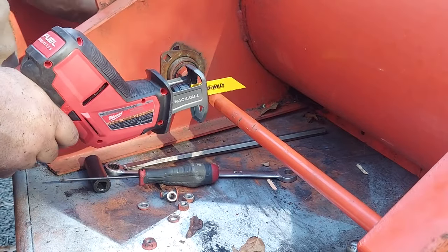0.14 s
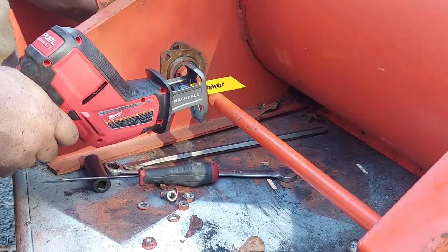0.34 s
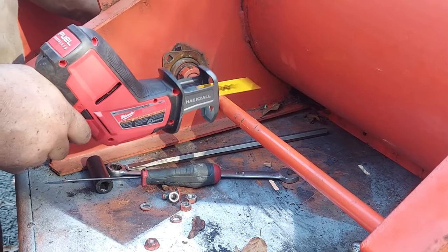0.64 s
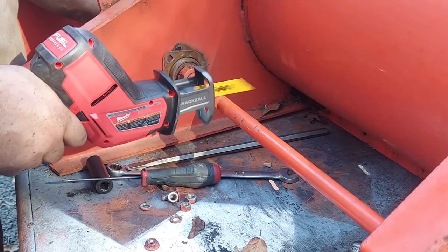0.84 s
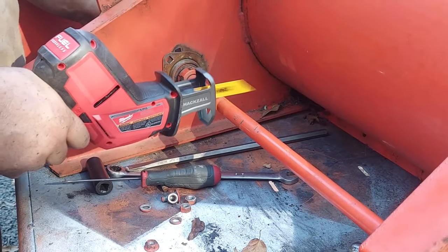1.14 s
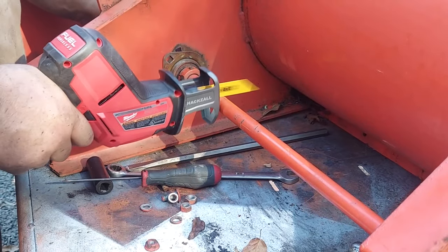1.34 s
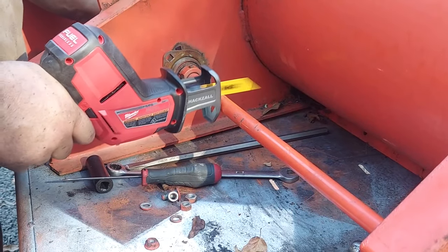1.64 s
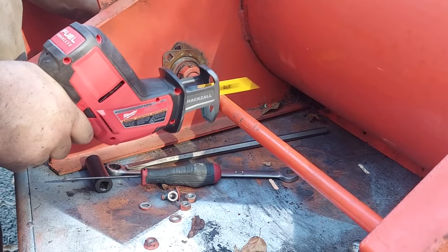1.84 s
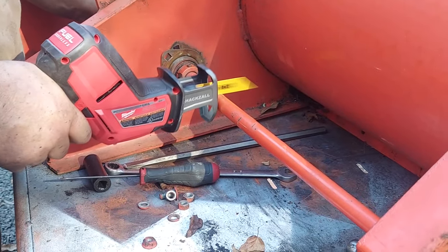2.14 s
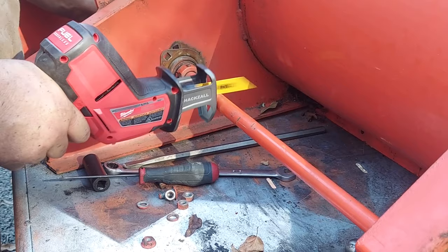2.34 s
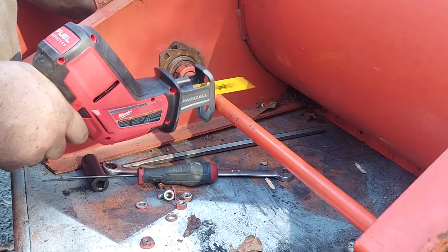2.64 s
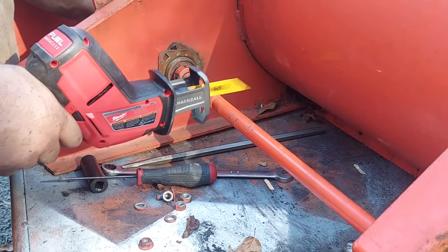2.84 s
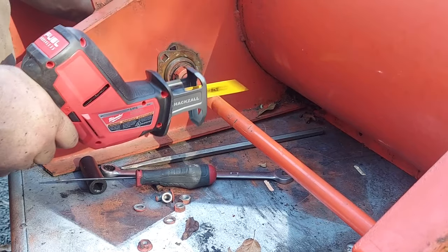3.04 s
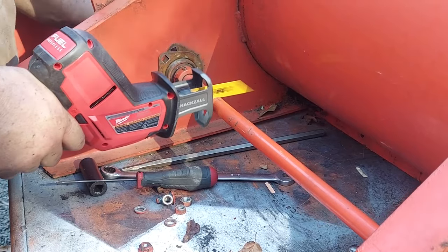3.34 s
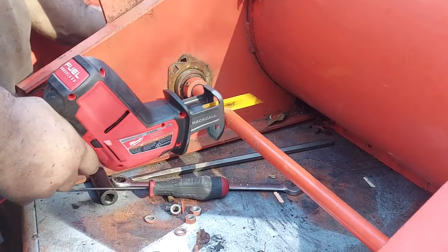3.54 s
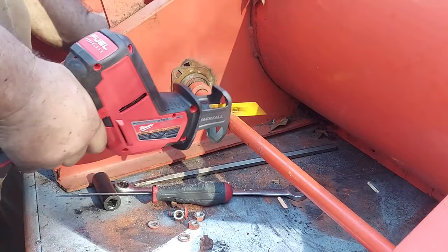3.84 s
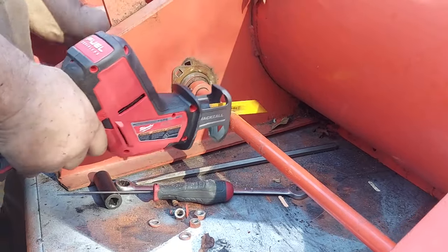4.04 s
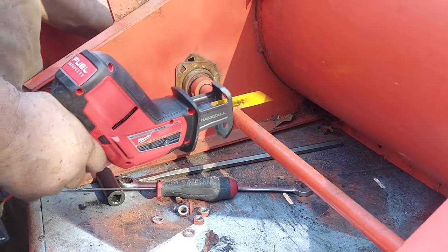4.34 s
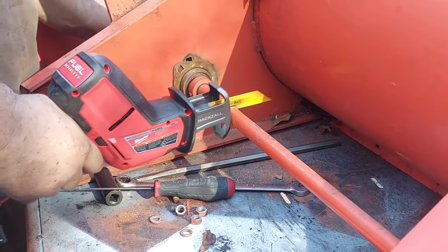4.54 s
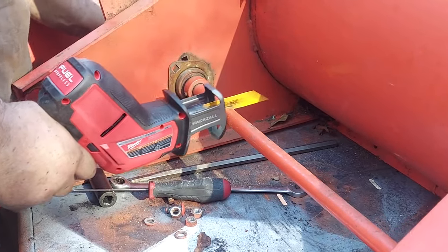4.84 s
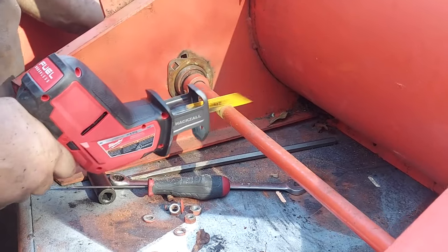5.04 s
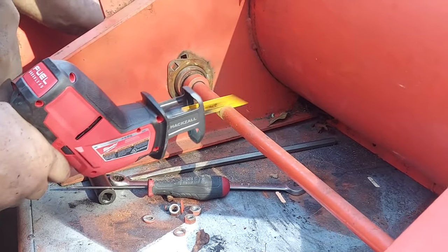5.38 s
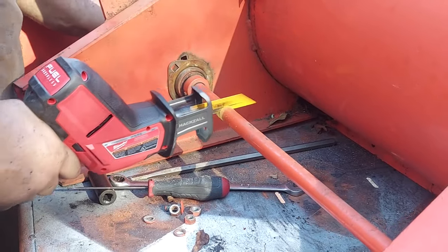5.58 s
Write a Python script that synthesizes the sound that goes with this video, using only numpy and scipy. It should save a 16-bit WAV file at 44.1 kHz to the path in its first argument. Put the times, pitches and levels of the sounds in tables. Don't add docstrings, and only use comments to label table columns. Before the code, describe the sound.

After a quiet moment, trigger clicks and chirps lead into harsh metal sawing, which jumps at three seconds to a frantic sped-up whine.

```python
import sys
import numpy as np
from scipy import signal
from scipy.fft import rfft, irfft, next_fast_len
from scipy.io import wavfile
from scipy.ndimage import uniform_filter1d, map_coordinates

SR = 44100
rng = np.random.default_rng(int(sys.argv[2]) if len(sys.argv) > 2 else 0)


def elevation(decibels):
    levels = np.asarray(decibels, float)
    return 10 ** (levels / 20)


def digitize_waveform(pressure):
    field = np.atleast_2d(pressure).T
    bounded = np.clip(field, -1, 1)
    quanta = np.round(bounded * 32767).astype(np.int16)
    wavfile.write(sys.argv[1], SR, quanta)


N = 251811


def rms_one(x):
    return x / np.sqrt(np.mean(x ** 2) + 1e-20)


def at_hz(points, hz):
    table_hz, value = np.transpose(points)
    return np.interp(np.log(hz), np.log(table_hz), value)


def at_time(points, t):
    return np.interp(t, *np.transpose(points))


def in_time(rows):
    s, *columns = np.transpose(rows)
    at = np.arange(round(s[0] * SR), min(round(s[-1] * SR), N))
    return at[0], [np.interp(at / SR, s, c) for c in columns]


def add(mix, start, x):
    mix[:, start:start + x.shape[-1]] += x[..., :N - start]


def drift(size, rate_hz):
    knots = rng.standard_normal(int(size / SR * 200) + 400)
    r = np.exp(-2 * np.pi * min(rate_hz, 60) / 200)
    slow = rms_one(signal.lfilter([1], [1, -2 * r, r * r], knots)[398:])
    return np.interp(np.arange(size) / SR * 200, np.arange(len(slow)), slow)


def swells(events, t, rise_db_per_s, fall_db_per_s):
    s, db, held = np.transpose(events)[:, :, None]
    rising = rise_db_per_s * np.maximum(s - t, 0)
    falling = fall_db_per_s * np.maximum(t - s - held, 0)
    return np.max(db - rising - falling, axis=0)


def resonate(x, hz, width_hz):
    r = np.exp(-np.pi * width_hz / SR)
    poles = [1, -2 * r * np.cos(2 * np.pi * hz / SR), r * r]
    return signal.lfilter([(1 - r * r) / 2, 0, (r * r - 1) / 2], poles, x)


def high_passed(x, hz):
    return signal.sosfilt(signal.butter(3, hz, "high", fs=SR, output="sos"), x)


def coloured(x, spectrum):
    size = next_fast_len(x.shape[-1])
    hz = np.maximum(np.fft.rfftfreq(size, 1 / SR), 1)
    shaped = irfft(rfft(x, size) * elevation(at_hz(spectrum, hz)), size)
    return rms_one(shaped[..., :x.shape[-1]])


def grit(shape, spread_db):
    sizes = elevation(spread_db * rng.standard_normal(shape))
    return rms_one(rng.standard_normal(shape) * sizes)


def spliced(x):
    at = np.arange(x.shape[-1])
    return x * np.minimum(np.minimum(at, at[::-1]) / (.002 * SR), 1)


# (frequency [Hz], density [dB per Hz])
YARD = [(15, -40), (25, -35), (43, -28), (102, -1), (236, -9), (591, -9), (1160, -24), (1560, -16),
        (2280, -32), (4370, -41), (6380, -18), (9320, -48), (16000, -57)]


def yard(size):
    mid, side = coloured(rng.standard_normal((2, size)), YARD)
    return elevation(-61.5) * (mid + 0.7 * side * [[1], [-1]])


# (time [s], level [dB], time to fall 25 dB [s])
CHIRPS = [
    (0.238, -32.5, 0.015),
    (0.407, -36, 0.013),
    (0.443, -30, 0.012),
]
CHIRP_OVERTONES = [12, -12, -36, -26]


def chirps():
    out, t = np.zeros((2, N)), np.arange(int(.08 * SR)) / SR
    for s, db, t60 in CHIRPS:
        tone = sum(elevation(overtone_db) * np.sin(2 * np.pi * k * 3870 * t)
                   for k, overtone_db in enumerate(CHIRP_OVERTONES, 1))
        flutter = 1 + 0.35 * drift(len(t), 60.0)
        attack = 1 - np.exp(-t / 0.00054)
        decay = elevation(db - 25 * t / t60) + elevation(db - 28 - 80 * t)
        add(out, round(s * SR), decay * attack * tone * flutter)
    return out


# (time [s], peak level [dB])
TICKS = [
    (0.248, -26),
    (0.28, -29),
    (0.289, -27),
    (0.304, -43),
    (.3625, -39),
    (.4025, -34),
    (0.408, -20),
]


def ticks():
    out, t = np.zeros((2, N)), np.arange(int(.08 * SR)) / SR
    for s, db in TICKS:
        snap = rng.standard_normal((2, len(t))) + 0.46 * rng.standard_normal(len(t))
        body = resonate(resonate(snap, 2400, 5200), 3400, 7900)
        add(out, round(s * SR), elevation(db - 3.5 - 60 * t / 0.024) * body)
    return out


BITE_S = .4295
# (time [s], level [dB], held [s])
SHUFFLES = [
    (.242, -41, 0.022),
    (.28, -33, 0.006),
    (.295, -36.5, 0.0038),
    (.32, -47, 0.03),
    (.405, -40, .02),
]
# (frequency [Hz], density [dB per Hz])
SHUFFLE_COLOUR = [(35, -39.5), (60, -22), (258, -20), (364, -21), (587, -12), (658, -20), (1250, -18.5),
                  (1600, -22.5), (2200, -27.5), (14000, -60)]


def shuffle():
    out, start = np.zeros((2, N)), round(CHIRPS[0][0] * SR)
    t = np.arange(start, BITE_S * SR) / SR
    db = swells(SHUFFLES, t, rise_db_per_s=4000, fall_db_per_s=400)
    mid, side = coloured(grit((2, len(db)), spread_db=5.0), SHUFFLE_COLOUR)
    add(out, start, elevation(db) * (mid + 0.47 * side * [[1], [-1]]))
    return out


# (time [s], level over a light touch [dB], held [s])
LEANS = [(3.4, 8.5, .09), (3.57, 7, 0.04), (3.66, 14, .14), (3.86, 12.5, 0.029), (4.09, 9, 0.028),
         (4.24, 13.5, .05), (4.44, 15.5, 0.072), (4.56, 10, 0.042), (4.65, 16, 0.21), (4.93, 6.5, 0.0386),
         (5.3, 10, 0.081), (5.43, 14, 0.0413), (5.54, 15.5, 0.061), (5.66, 10, 0.042)]


def shoe_lean(t):
    return swells(LEANS, t, rise_db_per_s=220.5, fall_db_per_s=190)


LASTING = [0.39, .25, .25]
# (order [per stroke], level [dB])
FAVOURED = [
    [(4, -7.5), (5, 3), (7, -4), (8, -4), (9, 1), (13, 3), (14, -1), (15, 1), (16, 2.5), (17, -1),
     (18, -1.5), (20, 5), (23, -2.5), (24, 2), (25, -3), (30, 2)],
    [(3, -6), (10, 1), (12, 1.5), (14, -5), (16, -5), (17, -5), (23, -3), (24, 0), (25, 2), (27, -1),
     (28, -4)],
    [(5, -5), (7, -4), (8, -4), (9, -6), (10, 1.5), (12, 1.5), (16, -4), (18, -10), (19, -5), (20, -2),
     (21, -1), (22, -5), (23, -7), (24, -1), (25, 1), (27, 1)],
]


def teeth(strokes, memory, speed):
    slots = int(len(strokes) / strokes[-1])
    fresh = grit((2, int(len(strokes) / slots * 1.2) + 40, slots), spread_db=3.0)
    wearing = rms_one(signal.lfilter([1], [1, -memory], fresh, axis=1)[:, 30:])
    lasting = np.exp(1j * np.angle(rfft(fresh[:, :1])))
    share = LASTING[speed]
    orders = np.sqrt(1 - share) * rfft(wearing) + np.sqrt(share * slots) * lasting
    for k, db in FAVOURED[speed]:
        orders[..., k] *= elevation(db)
    worn = irfft(orders, slots).reshape(2, -1)
    return rms_one(np.array([map_coordinates(w, [strokes * slots], order=3) for w in worn]))


# (frequency at true speed [Hz], share [0-1])
SAMENESS = [(40, .6), (100, .72), (180, .84), (300, .86), (420, .8), (700, .78), (1100, .66), (1500, .6),
            (3000, .4), (8000, .1)]
# (frequency at true speed [Hz], depth [dB])
THROB = [(100, 4.5), (600, 2), (1500, 1.5), (2600, 2.5), (5000, 1.13), (9000, 3.5), (15000, 3.5)]
# (frequency at true speed [Hz], likeness [0-1])
LIKENESS = [(30, .9), (60, .95), (125, .985), (250, .975), (500, .95), (700, .82), (1000, .66), (1400, .5),
            (1900, .25), (3000, .1), (15000, .05)]
# (frequency at true speed [Hz], level [dB])
LEFT = [(60, 2.5), (250, 0.5), (500, -0.5), (1000, -2), (2000, 1), (4000, 0.3), (12000, -1.2)]
# (time [s], steadiness [0-1])
STEADY = [(.4, .72), (1.3, .65), (2.2, .92), (2.96, .9), (3.0, 1), (3.07, .97), (3.1, .8), (3.18, .85),
          (3.22, .98), (3.62, .95), (3.72, .7), (4.25, .68), (4.33, .97), (5.71, 1)]


def tooth_drive(strokes, now, lean_db, haste, speed, memory, flicker_db):
    size = len(strokes)
    steady = at_time(STEADY, now)
    again, loose = teeth(strokes, memory, speed), grit((2, size), spread_db=5.0)
    turn = 2 * np.pi * strokes
    beat = np.cos(turn) * 0.74 + np.cos(2 * turn - .8)
    together = drift(size, 31.0 * haste)
    low_lean_db = 0.19 * (np.maximum(lean_db, -3) - 8 * (speed == 2))

    def drive(hz, phased, delayed=True):
        true_hz = hz / haste
        same, alike = at_hz(SAMENESS, true_hz) * steady, at_hz(LIKENESS, true_hz)
        path = rng.integers(1000)
        returning = np.roll(again, delayed * path // haste, axis=1)
        chance = np.roll(loose, int(hz) + path, axis=1)
        mid, side = np.sqrt(same) * returning + np.sqrt(1 - same) * chance
        quarter_later = (-1) ** path * np.roll(mid, round(SR / hz / 4))
        side = np.sqrt(1 - phased) * side + np.sqrt(phased) * quarter_later
        swell_db = at_hz(THROB, true_hz) * beat
        swell_db = swell_db + flicker_db * (0.81 * together + drift(size, 7.1 * haste))
        if hz < 450 * haste:
            swell_db = swell_db + 7.5 * (1 - steady)
        if hz < 360 * haste:
            swell_db = swell_db + low_lean_db
        balance = elevation(at_hz(LEFT, true_hz) * np.array([[.5], [-.5]]))
        image = np.sqrt(1 + alike) * mid + np.sqrt(1 - alike) * side * [[1], [-1]]
        return elevation(swell_db) * balance * image

    return drive


def evened(x, haste):
    power = np.mean(x ** 2, axis=0)
    local = uniform_filter1d(power, size=int(.12 * SR / haste)) + 1e-20
    return x * (power.mean() / local) ** (.7 / 2)


PHASED_BANDS, PHASED_MODES = 0.26, 0.55


def add_rasp_bands(parts, drive, colour, haste, edges_hz):
    edges = np.geomspace(38 * haste, 17500, 19)
    for k, (low, high) in enumerate(zip(edges, edges[1:])):
        hz = np.sqrt(low * high)
        band_pass = signal.butter(2, [low, high], "band", fs=SR, output="sos")
        band = signal.sosfilt(band_pass, drive(hz, PHASED_BANDS, delayed=False))
        gain = (-1) ** k * elevation(at_hz(colour, hz))
        parts[np.searchsorted(edges_hz, hz)] += gain * band


# (frequency at true speed [Hz], width [Hz],
# level over the colour at normal [dB], fivefold [dB], sixfold speed [dB])
BODY = [(380.2, 15.4, 10.5, 3, 6.5), (543.6, 41.4, 11.5, -6, -3.5), (623.3, 18, 4, 2, -11),
        (661, 9.6, 8, 5, -2), (1000, 70, 1, 3, 5), (1241, 12.5, 8.5, 12.5, 6.5), (1517, 65, 0.5, -4, 9.5),
        (1675, 30, 3.5, 4, -16), (1930, 37, 3, 5, 5), (2455, 70, 2.5, -9, 8), (2528, 61, 5, 0, 6),
        (2626, 75, 6, 6, 8), (1820, 280, 4.5, -4, 3), (3050, 200, 7, 10, 0), (4615, 147, 1, 0, 0)]
# (time [s], level [dB])
PANEL = [(.4, -10), (1.05, -5), (1.35, 2.5), (2.25, 3), (2.5, 0.5), (2.961, -8.5), (3.0, 2.5)]
# (time [s], level [dB])
SHALLOW = [(.4, -11), (.46, 0.5), (1.0, -0.5), (1.3, -7), (5.71, -13)]


def add_body_rings(parts, drive, now, colour, haste, speed, edges_hz):
    for true_hz, true_width_hz, *levels_db in BODY:
        hz, width_hz = true_hz * haste, true_width_hz * haste
        if hz >= 16500:
            continue
        db = at_hz(colour, hz) + levels_db[speed] + 1.95 * drift(len(now), 1.4 * haste)
        if abs(true_hz / 545 - 1) < .16:
            db = db + at_time(PANEL, now)
        if abs(true_hz / 1820 - 1) < .05:
            db = db + at_time(SHALLOW, now)
        ring = resonate(resonate(drive(hz, PHASED_MODES), hz, width_hz), hz, 4 * width_hz)
        parts[np.searchsorted(edges_hz, hz)] += elevation(db) * evened(ring, haste)


def shaft_ring(drive, haste):
    hz = 1520 * haste
    ring = evened(resonate(drive(hz, PHASED_MODES), hz, 16.3 * haste), haste)
    return rms_one(resonate(ring, hz, hz))


# (housing [dB], rasp [dB], hiss [dB], shaft ring [dB])
LAYERS = [
    (-20, -17.5, -28, -21),
    (-30, -21, -23.5, -19.5),
    (-26.5, -23.5, -24, -23),
]
# (housing, rasp, hiss, shaft ring [dB per s])
DEEPENING = [(-2.5, -0.29, 0.5, -0.81), (3, 1, 3.5, -0.7), (-0.2, -0.78, -3, -1.55)]
# (housing, rasp, hiss, shaft ring [dB per dB])
FEED_SHARES = [(0.29, 1.1, 0.62, 0.32), (0.5, 0.9, 1, 0.32), (0.38, 0.24, 0.77, 3.4)]
# (housing, rasp, hiss [dB per dB])
BIND_SHARES = [(.01, 0.086, 0.15), (.01, .1, 0.18), (.01, .2, .45)]
# (time [s], level over the usual ring [dB], held [s])
BINDS = [(.51, 9.5, 0.0076), (.66, 9, 0.0092), (.82, -2, .01), (1.15, 8, 0.018), (1.42, 6.5, 0.078),
         (1.84, 10, 0.016), (1.98, 3, 0.028), (2.07, -5, .01), (2.24, 9, 0.15), (2.39, 11, 0.039),
         (2.53, 8.5, .2), (2.75, 10, 0.028), (2.86, -2, 0.074), (3.03, 4.5, 0.0076), (3.2, 1.5, 0.026),
         (3.43, 4.5, 0.0072), (3.6, 11, 0.032), (3.82, 6, 0.0063), (3.88, 2, .2), (4.2, 7, 0.007),
         (4.29, 7, 0.038), (4.39, 7, 0.019), (4.52, 11, 0.035), (4.6, 7, 0.045), (4.87, 9, 0.0034),
         (5.0, 8, 0.013), (5.1, 14, 0.026), (5.37, 9, 0.18), (5.705, 8.5, 0.011)]


def cut(rows, colour, haste, speed, edges_hz, memory, flicker_db):
    start, (per_s, feed_db) = in_time(rows)
    size = len(per_s)
    t = np.arange(size) / SR
    now = t + start / SR
    lean_db = shoe_lean(now) * (speed == 2)
    sag = .5 * uniform_filter1d(np.maximum(lean_db, 0), size=int(.05 * SR))
    strokes = np.cumsum(per_s - sag) / SR
    bind_db = np.maximum(swells(BINDS, now, rise_db_per_s=233, fall_db_per_s=250), 0)
    settings = zip(LAYERS[speed], DEEPENING[speed], FEED_SHARES[speed], (*BIND_SHARES[speed], 1))
    housing_db, rasp_db, hiss_db, ring_db = (
        db + slope * t + fed * feed_db + bound * bind_db for db, slope, fed, bound in settings)

    drive = tooth_drive(strokes, now, lean_db, haste, speed, memory, flicker_db)
    parts = np.zeros((3, 2, size))
    add_rasp_bands(parts, drive, colour, haste, edges_hz)
    add_body_rings(parts, drive, now, colour, haste, speed, edges_hz)
    for k, edge in enumerate(edges_hz):
        parts[k + 1] = high_passed(parts[k + 1], .5 * edge)
    sound = elevation(ring_db - 3.0) * shaft_ring(drive, haste)
    for part, db in zip(parts, (housing_db, rasp_db - 0.48, hiss_db)):
        sound += elevation(db + 3.0) * rms_one(part)
    late_left = np.pad(sound[0], (2 // haste, 0))[:size]
    return start, np.array([late_left, sound[1]]), 2 * np.pi * strokes


# (time [s], unloaded strokes [per s], feed pressure [dB])
NORMAL = [(.403, 29.3, -15), (.43, 32, -5), (.465, 35, -1), (.55, 42.2, -3), (1.12, 41.4, 2),
          (1.27, 40.7, 1), (1.44, 41.3, 0), (2.2, 41.4, -1.5), (2.66, 40.6, -0.5), (2.9, 41.4, 0),
          (2.97, 41.0, -4)]
# (frequency [Hz], density [dB per Hz])
NORMAL_COLOUR = [(18, -72), (30, -43.5), (332, -13.5), (369, -13.5), (455, -8), (546, -4), (709, -5.5),
                 (1360, -1), (1510, 0.5), (2070, -7.5), (2550, -5), (3490, -22), (4540, -17.5), (9430, -33),
                 (15500, -30)]


def normal_cut():
    start, sound, turn = cut(NORMAL, NORMAL_COLOUR, haste=1, speed=0, edges_hz=[800, 3200],
                             memory=0.87, flicker_db=0.77)
    now = (np.arange(len(turn)) + start) / SR
    unseated = np.clip(1 - (now - BITE_S) / .032, 0, 1)
    return start, sound * elevation(-7 * unseated)


# (time [s], frequency [Hz], level [dB])
WHINE = [
    (.42, 7800, -40),
    (.445, 7900, -31),
    (.5, 8070, -26),
    (.62, 8120, -29),
    (.91, 7970, -27.5),
    (1.5, 7830, -32),
    (2.5, 7850, -31),
    (2.97, 7740, -32),
]


def whine():
    start, (hz, db) = in_time(WHINE)
    low_pass = signal.butter(2, 190.0, fs=SR, output="sos")
    shimmer = signal.sosfilt(low_pass, rng.standard_normal((2, len(hz))))
    carrier = np.cos(2 * np.pi * np.cumsum(hz) / SR)
    return start, elevation(db - 8.5) * rms_one((shimmer + shimmer[::-1] * 0.21) * carrier)


# (time [s], level [dB], frequency [Hz], 60 dB decay [s])
SNAGS = [(0.4394, -22, 900, 0.027), (0.4555, -5, 1564, 0.033), (0.486, -11, 1450, .03),
         (0.5134, -5.5, 1515, 0.04), (0.612, -5, 1570, 0.032), (.657, 1, 1526, 0.027),
         (.662, -11, 1500, .015), (0.683, -5, 1490, .04), (0.708, -2, 1474, 0.035), (0.777, 0, 1170, .022),
         (.804, -9, 2620, 0.023), (.8464, -3, 1490, .025), (0.894, -1, 1500, 0.019),
         (0.918, -2, 1460, 0.022), (0.967, -8, 1000, .02), (1.0444, -5, 1520, 0.021),
         (1.063, -9, 1490, .02), (1.383, -3, 1490, 0.028), (1.471, -7, 1630, .03), (1.5313, -8, 1490, .025),
         (1.698, -7, 1470, .025), (1.835, -6, 1520, .03), (1.92, -15, 1540, 0.022),
         (2.0651, -1, 1500, .025), (2.428, -14, 1520, .04), (2.5262, -7, 1520, 0.051),
         (2.5765, -7, 1520, 0.051), (2.7458, -5.5, 1520, .1), (2.82, -8, 1520, .04),
         (2.865, -9.5, 1520, 0.32)]


def snags():
    out, t = np.zeros((2, N)), np.arange(int(.12 * SR)) / SR
    for s, db, hz, t60 in SNAGS:
        noise = rms_one(resonate(rng.standard_normal((2, len(t))), 1900, 2600))
        crack = elevation(-12 - 60 * t / 0.015) * noise
        knock = elevation(-60 * t / t60) * np.sin(2 * np.pi * hz * t)
        attack = 1 - np.exp(-t / 0.0012)
        add(out, round(s * SR), elevation(db) * attack * (knock * [[.85], [1.1]] + crack))
    return out


def buzz(turn, orders, waver_db):
    return sum(elevation(db + 1.0 + waver_db * drift(len(turn), 4.5)) * np.sin(k * turn + k * k)
               for k, db in orders)


def songs(events, start, turn):
    t, out = (start + np.arange(len(turn))) / SR, np.zeros((2, len(turn)))
    for s, order, db, held in events:
        near = slice(*np.searchsorted(t, [s - .1, s + held + .1]))
        level = elevation(swells([(s, db + 0.5, held)], t[near], rise_db_per_s=352, fall_db_per_s=296))
        k = round(order)
        out[:, near] += level * np.sin(k * turn[near] + k ** 2 + [[0], [.6]])
    return out


# (time [s], unloaded strokes [per s], feed pressure [dB])
FIVEFOLD = [
    (2.967, 207.1, -2.5),
    (3.065, 206.2, -4),
    (3.105, 203.5, -4.5),
    (3.17, 202.3, -2),
    (3.2, 200.7, -0.5),
    (3.31, 202.6, -2),
    (3.39, 200.1, -0.5),
]
# (frequency [Hz], density [dB per Hz])
FIVEFOLD_COLOUR = [(150, -40), (400, -32), (750, -31.5), (1200, -19), (2000, -11), (3000, -12), (5000, -6),
                   (7600, -5.5), (11000, -8), (13000, 3), (16000, -13)]
# (order [per stroke], level [dB])
FIVEFOLD_BUZZ = [(2, -70), (3, -54), (4, -51.5), (5, -45), (6, -48), (7, -51), (8, -46), (9, -47),
                 (10, -54), (14, -36), (15, -52), (23, -54), (25, -42), (27, -44)]
# (time [s], order [per stroke], level [dB], held [s])
FIVEFOLD_SONGS = [(3.0, 9, -39.5, 0.086), (3.0, 10, -39, .05), (3.02, 15, -32, 0.024),
                  (3.03, 23, -34, 0.033), (2.2, 25, -33, 0.067), (2.99, 30, -36, 0.087),
                  (3.23, 10, -34, 0.065), (3.32, 10, -28.5, 0.017), (3.24, 15, -29, 0.024),
                  (3.35, 15, -25, 0.04), (3.19, 23, -37, 0.058), (3.19, 25, -25.5, 0.067),
                  (3.35, 25, -30, .04), (3.15, 31, -32, 0.026), (3.03, 16, -34, 0.033),
                  (3.27, 23, -40, .02), (3.23, 14, -42, 0.046)]


def fivefold_cut():
    start, sound, turn = cut(FIVEFOLD, FIVEFOLD_COLOUR, haste=5, speed=1, edges_hz=[4000, 10500],
                             memory=.93, flicker_db=1.3)
    sound = sound + buzz(turn, FIVEFOLD_BUZZ, waver_db=0.0)
    return start, spliced(sound + songs(FIVEFOLD_SONGS, start, turn))


# (time [s], level [dB], frequency [Hz], held [s])
CHATTERS = [(3.4, -31, 2400, 0.035), (3.7, -31, 2430, 0.017), (3.815, -26, 3600, 0.045),
            (3.83, -31, 2300, .03), (3.88, -25, 6450, 0.046), (3.92, -34, 3540, .03),
            (4.07, -28.5, 3330, .04), (4.12, -26, 2492, 0.029), (4.13, -31, 4000, 0.027),
            (4.18, -34, 3533, 0.074), (4.43, -31, 2340, 0.033), (4.5, -36, 2350, 0.017),
            (4.6, -37, 2310, .03), (4.74, -30, 2300, 0.021), (4.8, -32, 2350, 0.052)]


def chatter(start, turn):
    t, out = (start + np.arange(len(turn))) / SR, np.zeros((2, len(turn)))
    once_a_stroke = np.diff(turn // (2 * np.pi), prepend=0)
    uneven = elevation(5 * rng.standard_normal(len(t))) * rng.choice([-1, 1], len(t))
    knocks = once_a_stroke * uneven + 0.038 * rng.standard_normal(out.shape)
    for s, db, hz, held in CHATTERS:
        near = slice(*np.searchsorted(t, [s - .05, s + held + .05]))
        level = elevation(swells([(s, db, held)], t[near], rise_db_per_s=1400, fall_db_per_s=700))
        out[:, near] += level * rms_one(resonate(resonate(knocks[:, near], hz, 260), hz, 520))
    return out


# (time [s], unloaded strokes [per s], feed pressure [dB])
SIXFOLD = [(3.39, 240.1, 0.5), (3.62, 240.4, -1.5), (3.71, 236.5, -1.5), (3.785, 241.7, -1),
           (3.825, 227, 1.5), (3.875, 242, 1.5), (4.04, 240.5, 1), (4.09, 237.4, 1), (4.13, 244.1, 1.5),
           (4.2, 241.5, 1), (4.225, 237.6, 1), (4.32, 240.3, 1), (4.41, 236.5, 0), (4.86, 239.2, 2),
           (5.13, 239.3, -2.5), (5.16, 239.1, -6), (5.27, 236.8, -4.5), (5.71, 240, 2)]
# (frequency [Hz], density [dB per Hz])
SIXFOLD_COLOUR = [(100, -85), (300, -37.5), (500, -30.5), (830, -42), (1200, -19.5), (1800, -17.5),
                  (2400, -14), (3500, -6.5), (4300, -13), (5200, -10), (6000, -6), (7000, -4), (9200, -5),
                  (12000, -8), (16000, -15)]
# (order [per stroke], level [dB])
SIXFOLD_BUZZ = [(1, -84), (4, -61), (5, -52), (6, -48), (8, -81), (9, -70), (10, -49), (12, -53),
                (14, -80.5), (16, -84)]
# (order [per stroke], level at a light touch [dB],
# share of the lean [dB per dB], growth [dB per s])
LEANING_ORDERS = [(2, -57.5, 0.038, -8), (3, -45.5, 0.82, 0.56), (7, -51.5, 0.87, 5.5),
                  (13, -51.5, 0.49, 0.5), (15, -44, 0.02, 4.5), (17, -51, 0.07, 4.5)]
# (time [s], order [per stroke], level [dB], held [s])
SIXFOLD_SONGS = [(3.4, 16.5, -31, 0.062), (3.52, 18, -25, 0.069), (3.58, 13, -35, 0.053),
                 (3.86, 6.05, -35.5, 0.067), (3.86, 7.4, -39, 0.056), (3.9, 2, -48, .3),
                 (3.93, 14.8, -42, 0.036), (3.95, 18, -28, 0.08), (4.1, 16, -29, 0.053),
                 (4.24, 13, -42, 0.026), (4.29, 17.2, -25, 0.11), (4.43, 14.6, -33, .08),
                 (4.55, 16.4, -30, .15), (4.46, 17.2, -31, 0.17), (4.62, 6.3, -35.5, 0.058),
                 (4.72, 15.1, -29.5, 0.2), (4.8, 13, -29, 0.093), (4.97, 15.6, -31, 0.12),
                 (5.12, 15.4, -24, 0.13), (5.3, 17.3, -30, 0.12), (5.33, 12.6, -28, .24),
                 (5.4, 15.2, -23.5, 0.24), (5.46, 18, -28.5, .22), (5.3, 5.1, -48, 0.087),
                 (4.4, 7.4, -35.5, 0.12), (4.62, 7.55, -38.5, 0.23), (4.44, 13, -41, 0.049),
                 (4.82, 17.4, -34, 0.051), (3.44, 3, -50.5, 0.17), (3.72, 13, -37, .05),
                 (3.88, 27, -28, .17), (4.25, 27, -30, .17), (4.47, 30, -43, .55), (5.3, 22.5, -31, 0.43),
                 (3.43, 29, -34, 0.23), (3.88, 24, -34, 0.43), (4.25, 32, -36, .15), (4.95, 28, -36, 0.37),
                 (5.3, 27, -33, 0.36), (3.43, 20, -37, .35), (4.25, 20, -34, 0.14), (5.3, 20.4, -34, .4),
                 (3.88, 21, -36, .17), (4.25, 23, -44, 0.7), (5.3, 21.5, -35, .4), (4.08, 14, -39, 0.27),
                 (5.0, 9.2, -45, .25), (3.43, 10.3, -39, .2)]


def sixfold_cut():
    start, sound, turn = cut(SIXFOLD, SIXFOLD_COLOUR, haste=6, speed=2, edges_hz=[4800, 10500],
                             memory=.925, flicker_db=1.3)
    t = np.arange(len(turn)) / SR
    lean_db = shoe_lean(t + start / SR)
    leaning = [(k, db + share * lean_db + growth * t) for k, db, share, growth in LEANING_ORDERS]
    sound = sound + buzz(turn, SIXFOLD_BUZZ, waver_db=3.0) + buzz(turn, leaning, waver_db=1.7)
    return start, spliced(sound + songs(SIXFOLD_SONGS, start, turn) + chatter(start, turn))


def scene():
    mix = chirps() + ticks() + shuffle() + snags()
    start, sound = normal_cut()
    add(mix, start, sound)
    add(mix, 0, yard(start + sound.shape[-1]))
    add(mix, *whine())
    add(mix, *fivefold_cut())
    add(mix, *sixfold_cut())
    return mix


def band_limit(x):
    return signal.sosfilt(signal.butter(12, 17090, fs=SR, output="sos"), x)


def record(dry):
    top_cut = signal.ellip(10, .5, 55, 15730, fs=SR, output="sos")
    mix = signal.sosfilt(top_cut, 1.112 * np.tanh(dry / 1.142))
    return band_limit(mix)


dry = scene()
out = record(dry)
digitize_waveform(out)
```